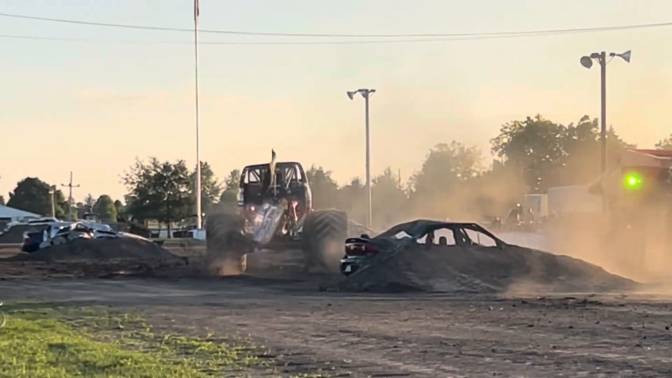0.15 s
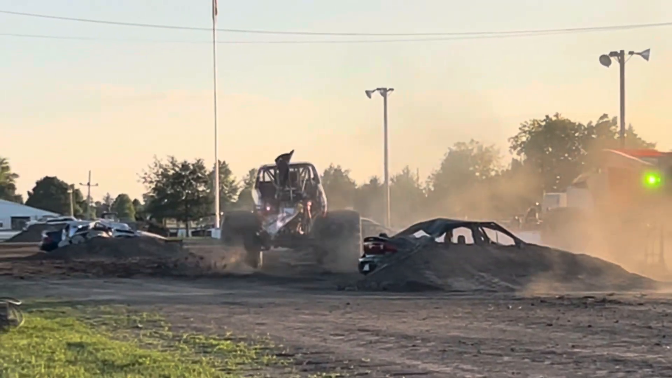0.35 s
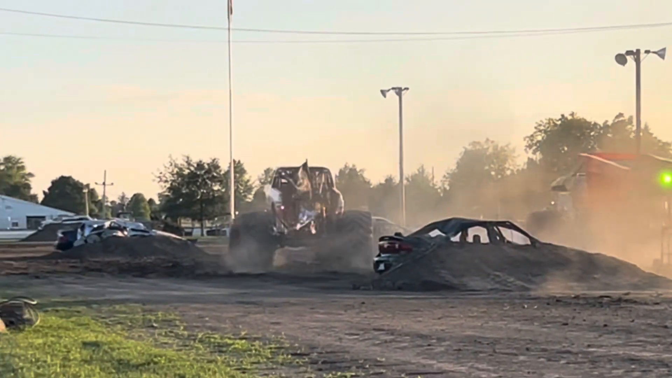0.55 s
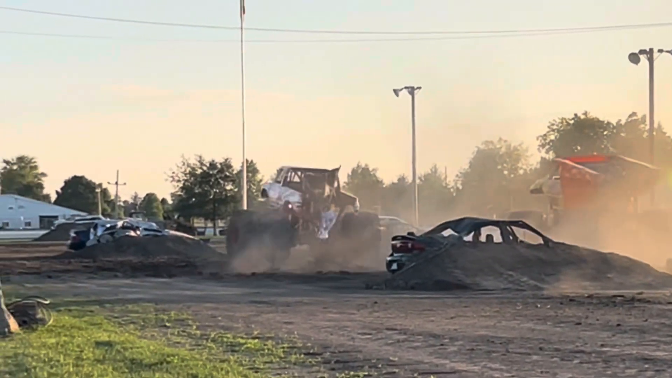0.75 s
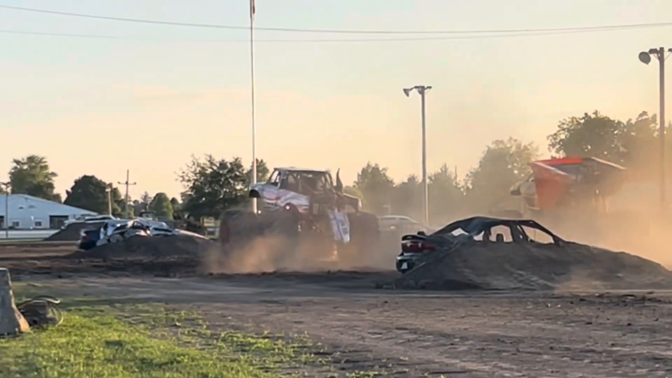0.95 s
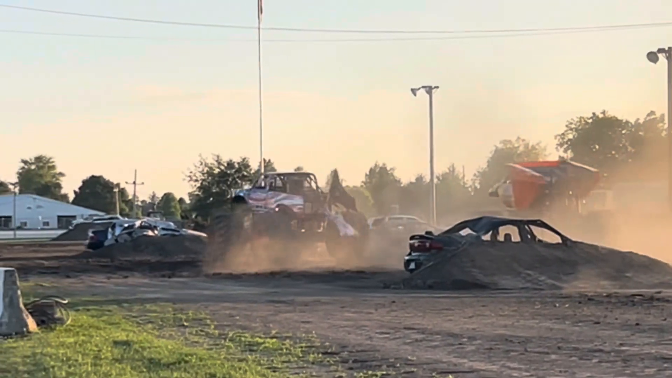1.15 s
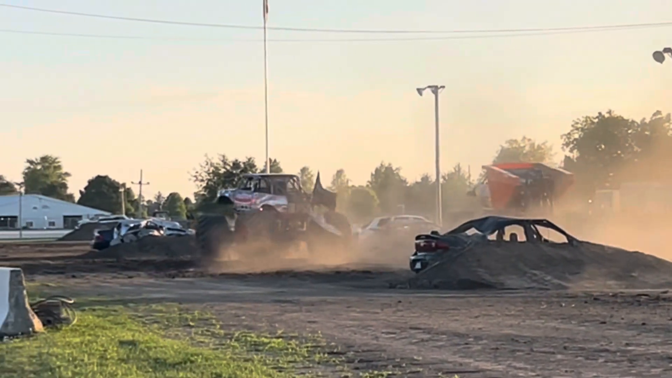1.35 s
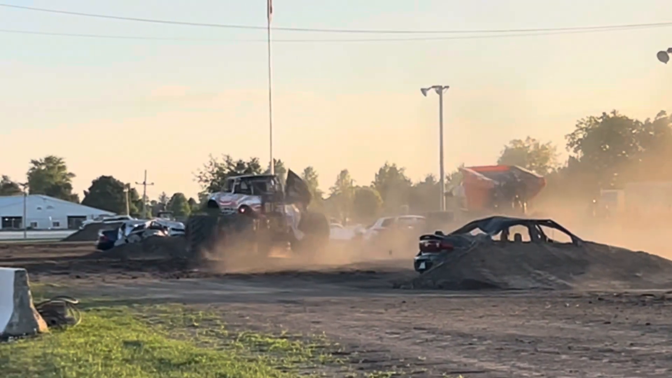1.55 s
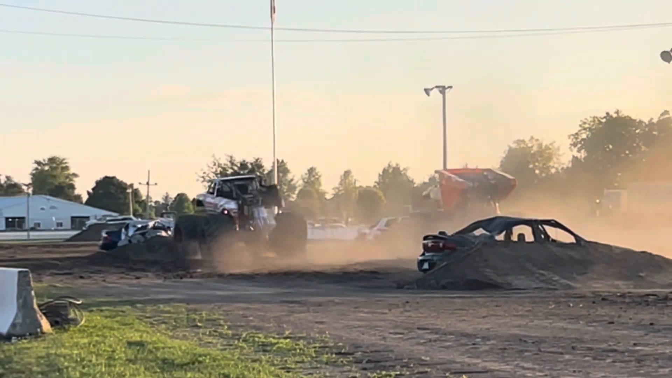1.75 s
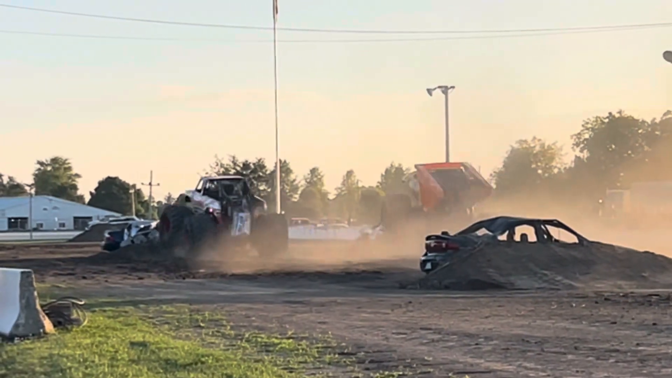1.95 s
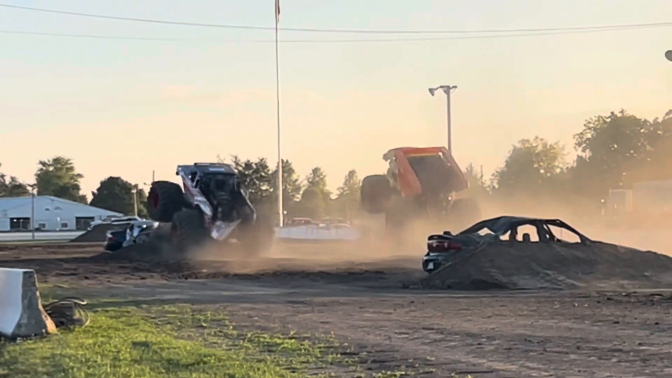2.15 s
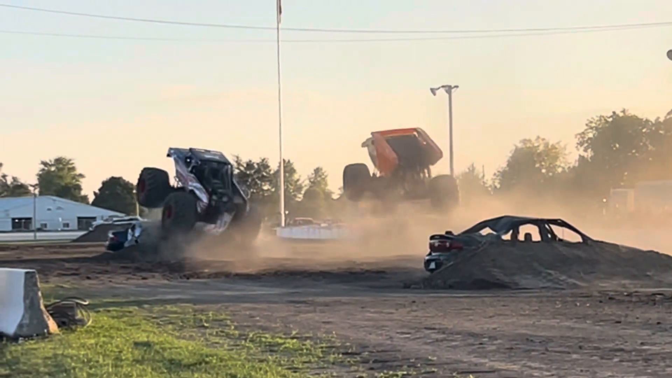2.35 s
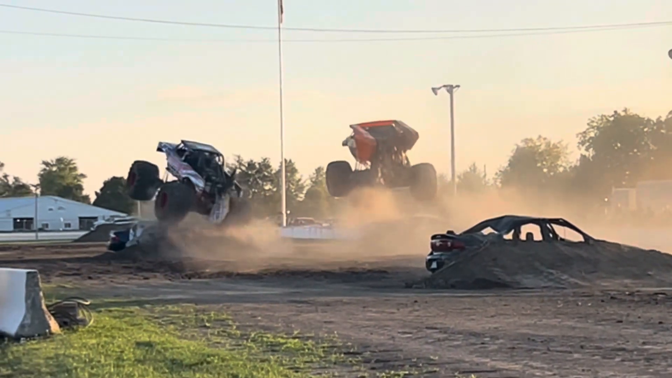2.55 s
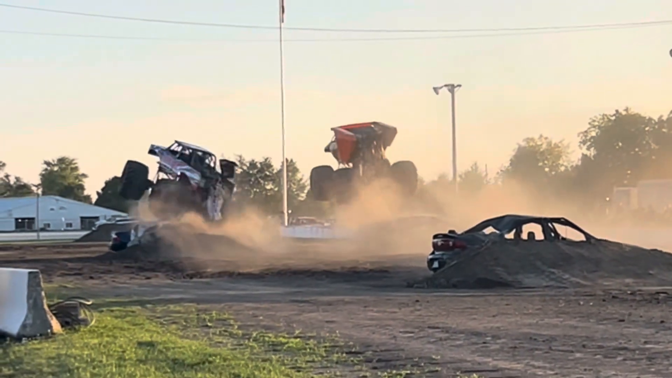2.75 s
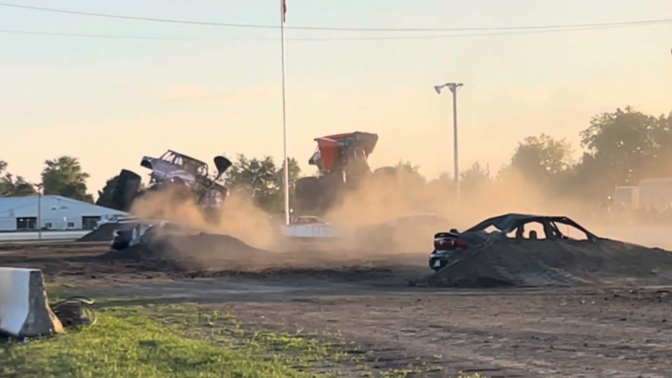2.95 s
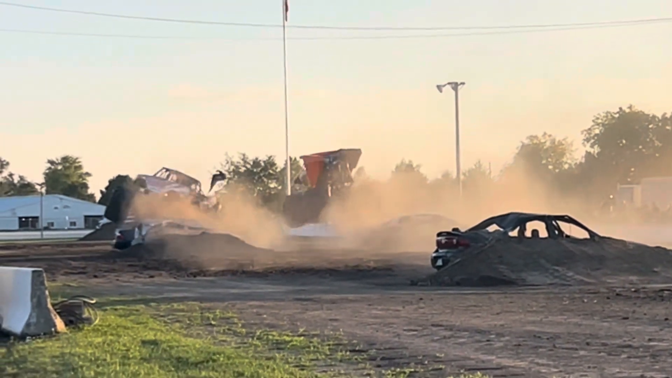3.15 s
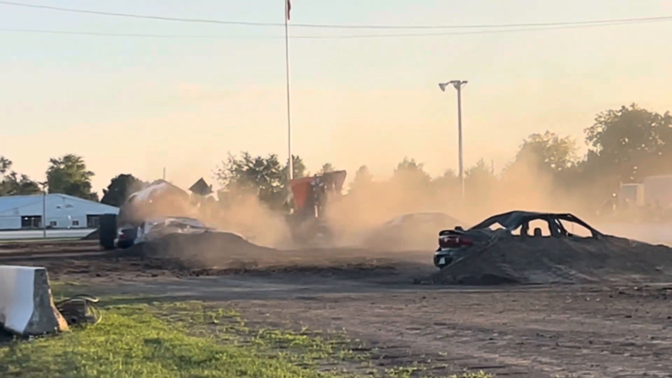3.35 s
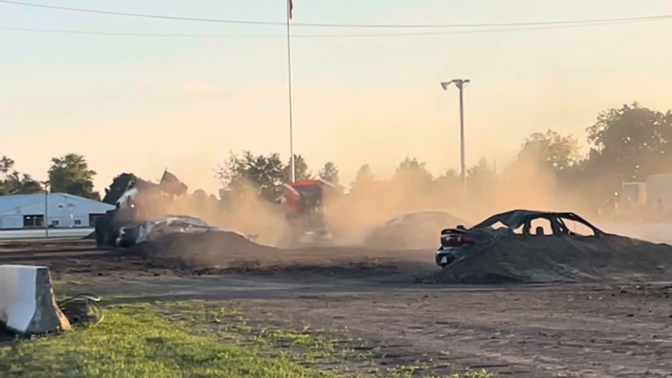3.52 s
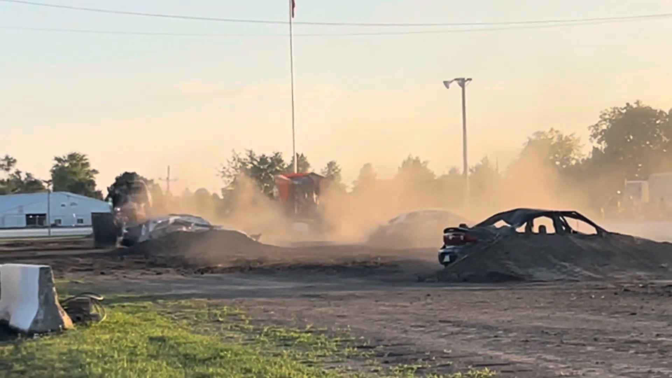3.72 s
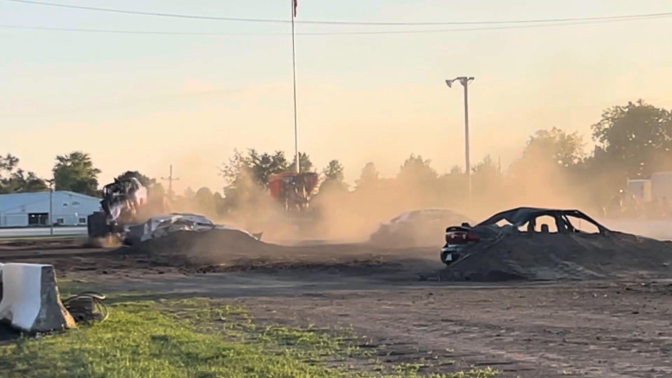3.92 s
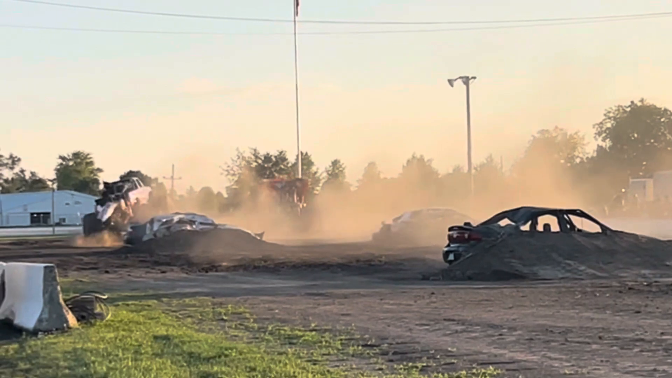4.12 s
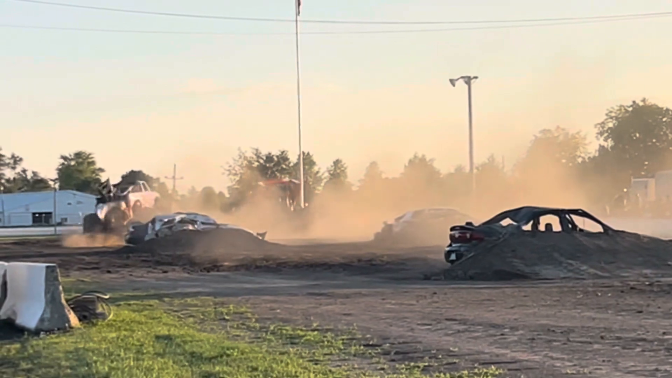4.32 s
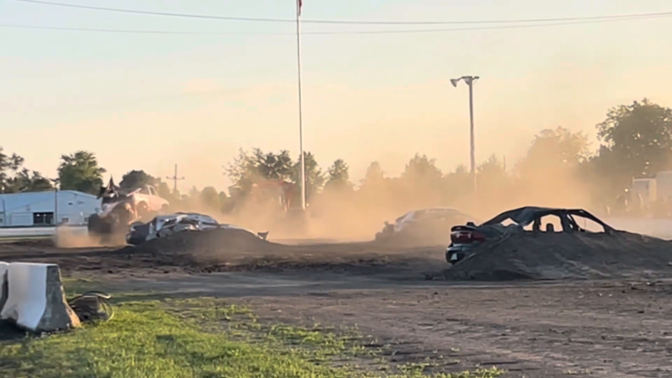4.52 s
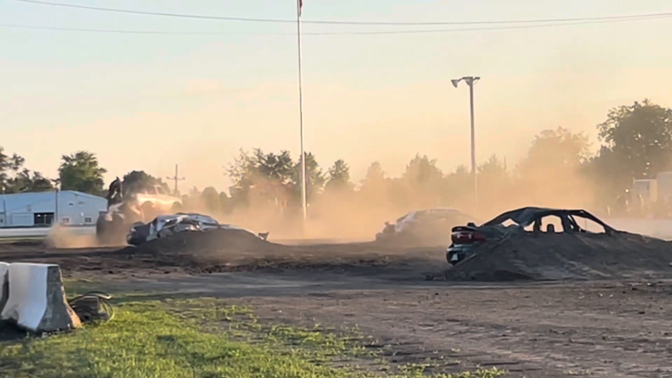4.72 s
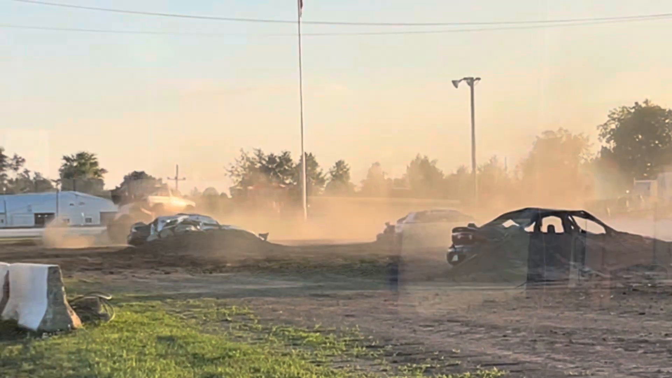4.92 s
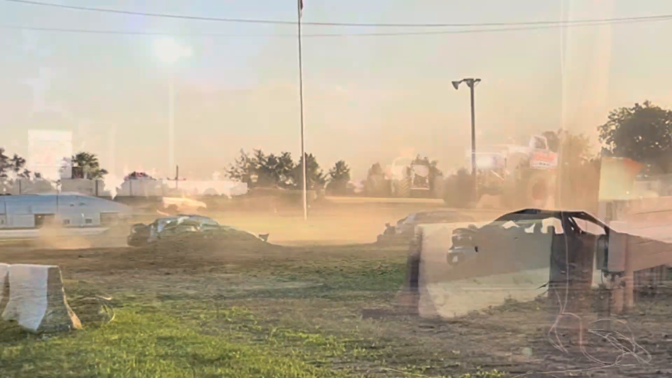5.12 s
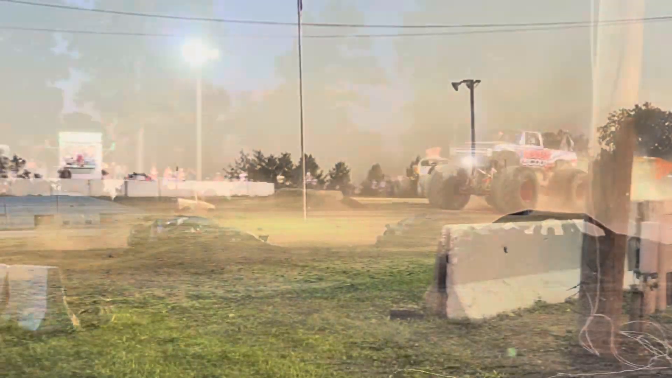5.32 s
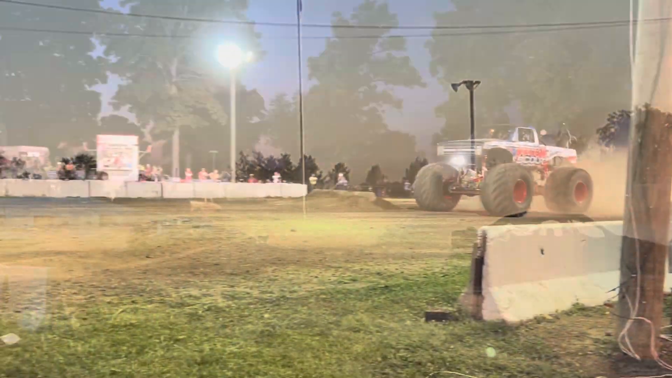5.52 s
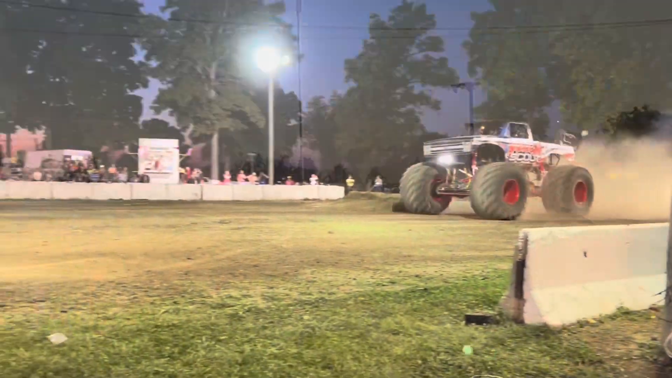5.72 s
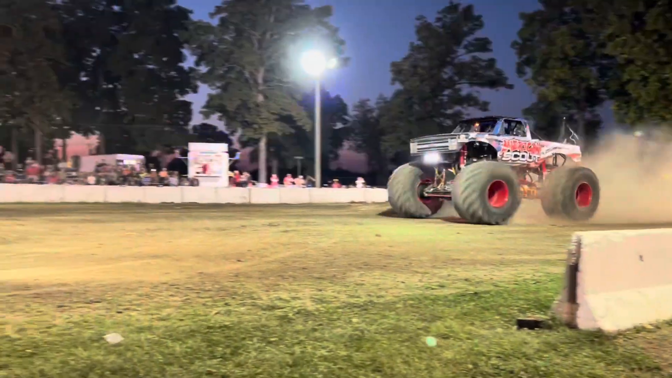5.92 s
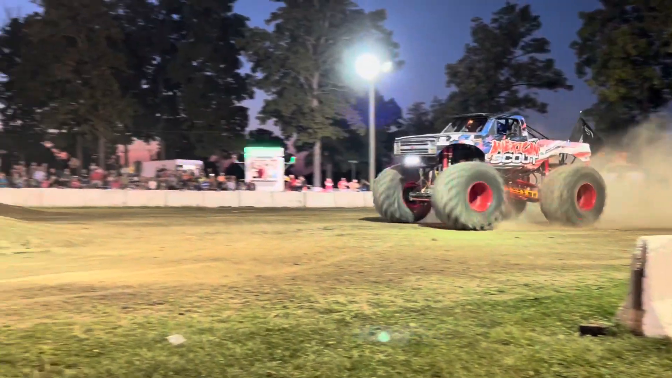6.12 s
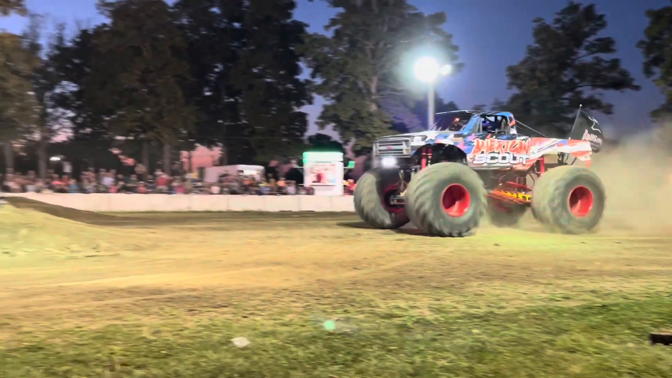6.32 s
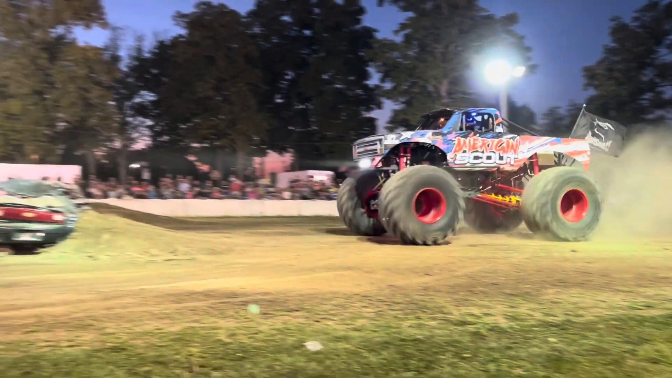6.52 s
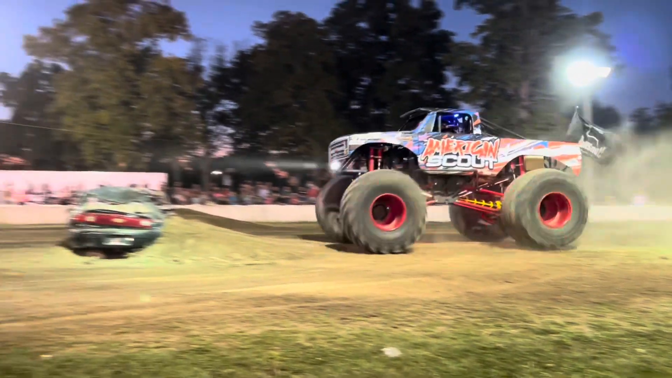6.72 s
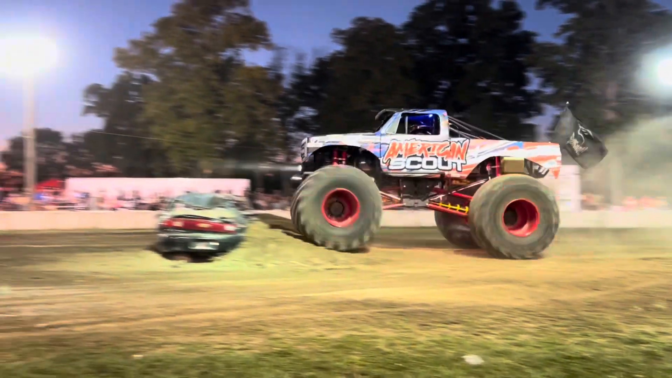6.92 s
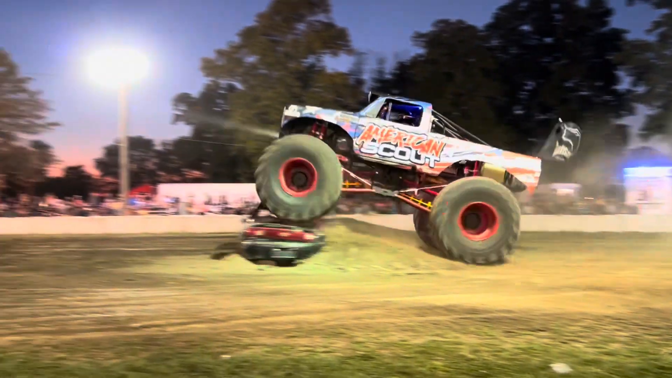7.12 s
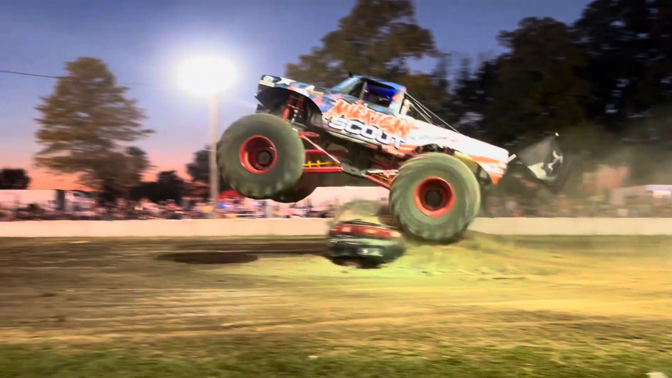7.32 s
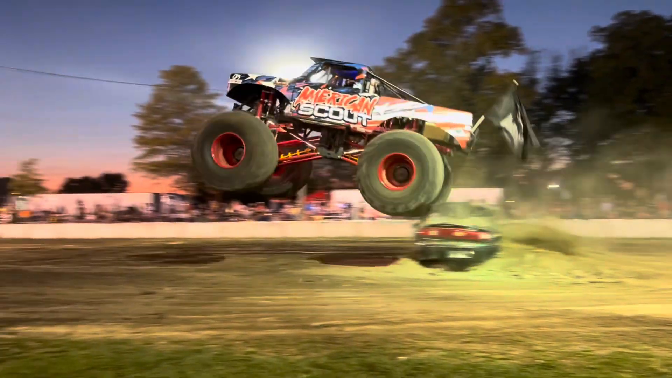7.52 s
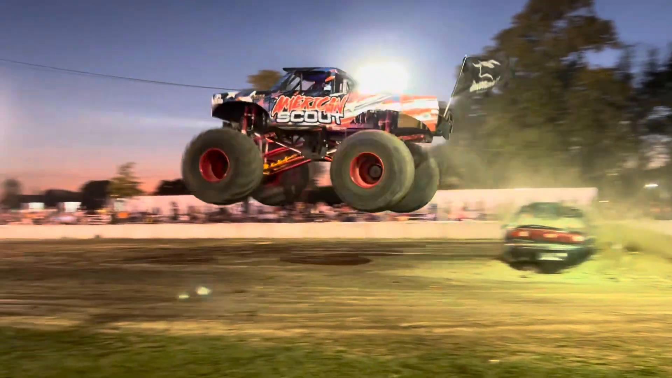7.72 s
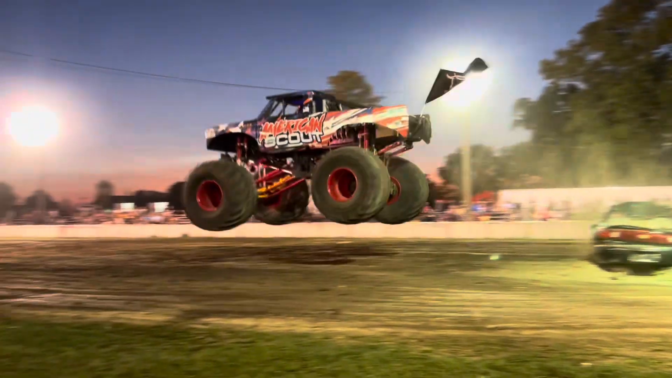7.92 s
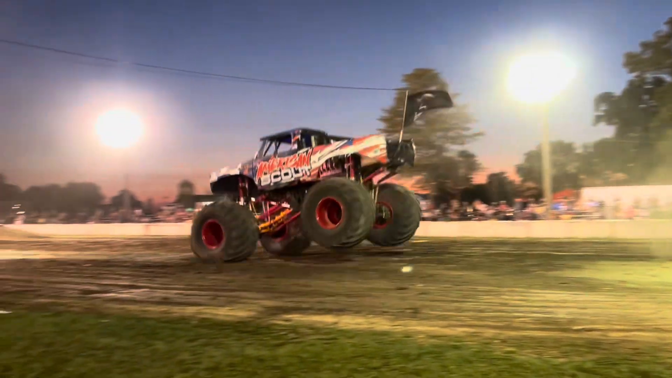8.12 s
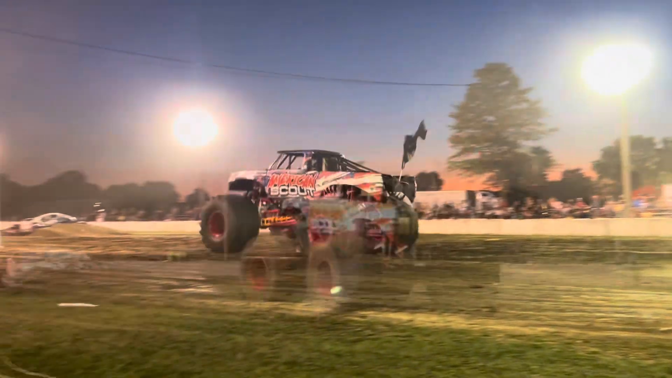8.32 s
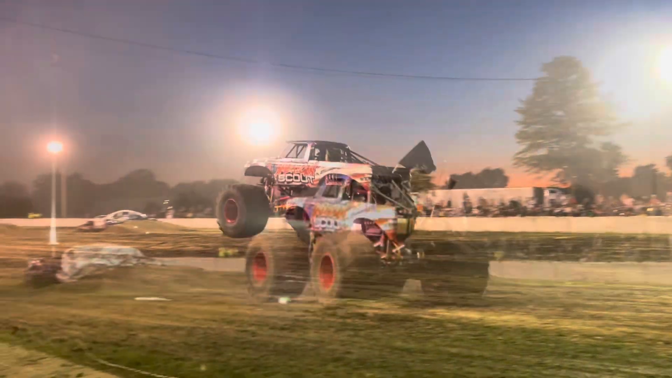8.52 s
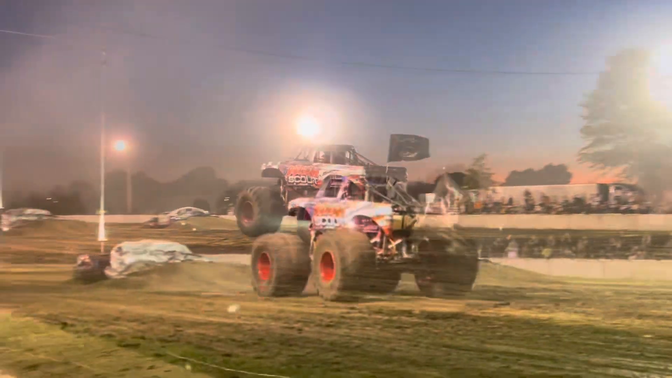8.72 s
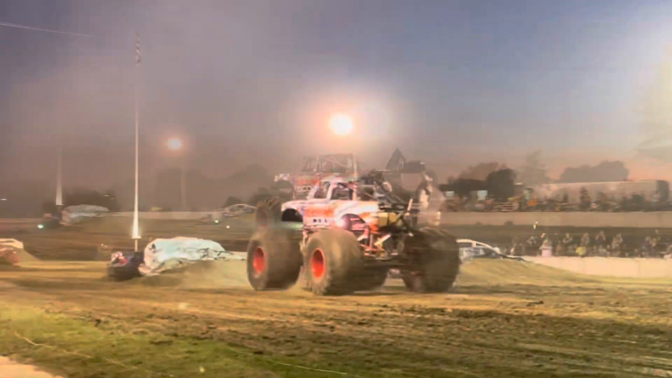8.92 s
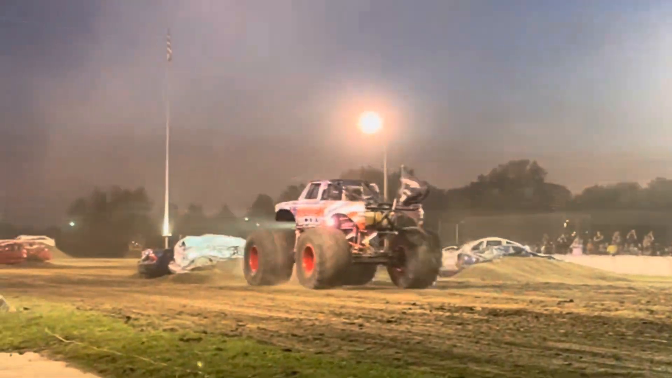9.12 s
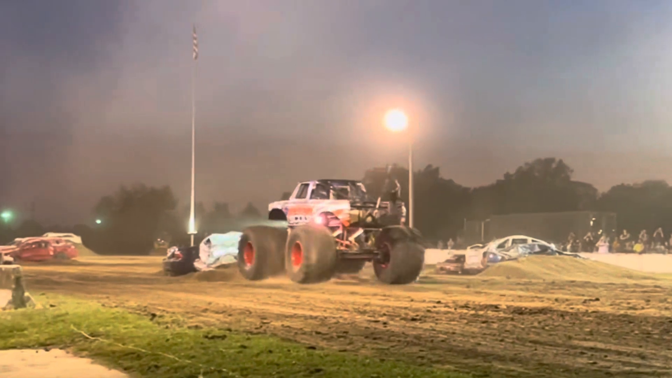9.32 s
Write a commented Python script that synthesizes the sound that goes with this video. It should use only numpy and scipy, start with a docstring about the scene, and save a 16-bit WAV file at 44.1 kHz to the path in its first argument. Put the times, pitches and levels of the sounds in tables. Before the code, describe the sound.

Handheld stereo microphone at an open-air showground: distant uneven engine bursts lie slightly left and sink to a coasting mutter. Around the middle, a much louder truck slightly right barks, surges, holds a full-throttle roar through a jump and stabs twice more, with overrun howl and small bangs. Softer growling blips follow, with faint reflections from fence and trees.

```python
"""Two far V8 monster trucks race over dirt jumps and coast away, heard in the open from the fence. Then, as the
scene changes, an idling mutter swells in and fades, a truck is gunned near by in short bursts, passes and blips
once after it lands; a last one revs farther off. Each engine drones on multiples of its cycle rate (eight
firings a cycle) and rasps as the throttle opens; speed and loudness chase the throttle. Waiting trucks add a
low rumble of band-limited noise. The microphone has two ports in a housing that shades and delays the sound."""
import sys
import numpy as np
from scipy import signal
from scipy.fft import rfft, irfft, next_fast_len
from scipy.io import wavfile
from scipy.ndimage import uniform_filter1d

SR = 44100
rng = np.random.default_rng(int(sys.argv[2]) if len(sys.argv) > 2 else 0)


def generate_wav(signal):
    """Clip the signal to [-1, 1] and save it as 16-bit WAV at the path in sys.argv[1]."""
    frames = np.transpose(np.atleast_2d(signal))
    scaled = np.clip(frames, -1, 1) * 32767
    pcm = np.round(scaled).astype(np.int16)
    wavfile.write(sys.argv[1], SR, pcm)


N = 412776
TIME = np.arange(N) / SR

# far racers: throttle of the first over the jumps
# [open_s, shut_s, toward_cycles_per_s, drone_db, rasp_rise_db]
FIRST_PULLS = [(0.0, 0.236, 34.5, -22, 9.5), (0.24, 0.529, 37, -22.5, 11), (0.53, 0.88, 35.8, -24, 9),
               (0.88, 1.22, 39.6, -23, 11.5), (1.391, 1.553, 35.6, -36, 2.5),
               (1.689, 1.929, 39.4, -27.5, 7.5), (2.048, 2.26, 26.2, -43, 5),
               (2.261, 2.399, 45.5, -21.5, 13), (2.399, 2.475, 39, -29, 12), (2.581, 2.679, 37, -28, 14),
               (2.679, 2.818, 45, -27, 13.5), (2.881, 3.1, 32, -52, 7.5), (3.099, 3.211, 45.6, -28, 12),
               (3.562, 3.731, 45, -33, 0.5)]
# longer pulls of the second, in a higher gear [open_s, shut_s, toward_cycles_per_s, drone_db]
SECOND_PULLS = [(0.0, 0.298, 48, -28.5), (0.361, 0.449, 49, -19), (0.56, 1.22, 42.7, -35.5),
                (1.39, 1.62, 43.7, -39.5), (1.62, 1.95, 44.8, -32.5), (2.0, 2.43, 47.4, -32.5),
                (2.799, 3.249, 60, -30)]
# multiples of the cycle rate favoured by the uneven firing of each bank [multiple, level_db]
FIRST_ORDERS = [(3, -16), (5, -16), (6, -13), (7, -15), (8, -1), (10, -16.5), (11, -16.5), (13, -22)]
SECOND_ORDERS = [(2, -13), (3, -3), (5, 0.5), (7, -12), (8, -6), (11, -9.5), (13, -11.5)]
# exhaust spectra of the racers [frequency_hz, level_db_per_hz]
RACE_BOOM = [(30, -30), (60, -8), (120, -3), (230, 2), (330, -1.5), (420, -4.5), (560, -7), (900, -17),
             (1500, -70)]
RACE_RASP = [(440, -27), (700, -5), (1150, -0.5), (1700, -3.5), (3200, -5), (4400, -12), (7420, -18),
             (8880, -22), (9710, -40), (10100, -68), (10800, -23), (11800, -29), (14600, -43), (16000, -47)]
# level as they draw away behind the ramps [time_s, level_db]
RACE_DISTANCE = [(0, 0.5), (3.2, 2.5), (3.7, -4.5), (4.2, -11), (4.85, -15), (5.4, -8)]
# treble, shadowed as they turn away [time_s, treble_db]
RACE_SHADOW = [(1.5, 20.5), (3, 5.5), (4.6, -13)]
# upper orders, swelling as the pipes swing toward the fence [time_s, level_db]
RACE_FACING = [(0.1, 0.5), (0.4, 6), (1.15, -2.5), (1.6, 10.5), (1.9, -0.5), (2.1, 5), (2.6, -7),
               (3.1, -3.5)]

# a low engine mutter swells in and fades as the scene changes [time_s, boom_db, rasp_db]
IDLE_SWELL = [(4.86, -62, -61), (4.92, -35, -48.5), (5.15, -35, -46), (5.38, -35, -51), (5.55, -22, -57)]

# near truck: stabs of the throttle [open_s, shut_s, toward_cycles_per_s, rasp_rise_db]
NEAR_STABS = [(5.453, 5.542, 19.8, 3), (5.54, 5.734, 33, 7), (5.734, 5.875, 46.4, 12),
              (6.219, 6.33, 44.2, 15), (6.402, 6.521, 47, 15), (6.535, 6.578, 28.9, 13),
              (6.579, 6.667, 45.8, 14), (6.935, 7.335, 47.9, 16.5), (7.463, 7.55, 49, 16.5),
              (7.671, 7.778, 50, 17)]
# multiples of its cycle rate [multiple, level_db]
NEAR_ORDERS = [(3, 1.5), (4, -17), (5, 0.5), (6, -15.5), (7, -12), (8, 0.5), (11, -3), (13, -6.5), (15, -8),
               (16, -13), (19, -11.5), (24, -12), (29, -12.5), (32, -11.5)]
# its headers with the ground reflection [frequency_hz, gain_db]
NEAR_PIPES = [(50, -10), (85, -8.5), (130, 0), (205, -1.5), (280, -4), (340, -7), (410, -20), (520, -7.5),
              (700, -6.5)]
# its exhaust spectra [frequency_hz, level_db_per_hz]
NEAR_BOOM = [(30, -26), (60, -3.5), (110, 1.5), (170, 3.5), (290, -6), (410, -17.5), (600, -12.5),
             (900, -30), (1500, -49)]
NEAR_RASP = [(240, -22), (400, -11.5), (626, -4), (800, -3.5), (994, -6.5), (1350, -6.5), (1650, -9),
             (3870, -16), (6150, -23), (8240, -22), (9040, -24.5), (10100, -72), (10900, -17.5),
             (11900, -24), (14400, -28.5), (16000, -30)]
# air rushing past its open throttle plates [frequency_hz, level_db_per_hz]
INTAKE = [(1200, -20), (3000, -1), (8000, -0.5), (13000, 2), (16000, -6)]
# level as it comes close, passes and turns its pipes away [time_s, level_db]
NEAR_PASS = [(5.35, -28.5), (5.5, -9.5), (5.8, 0.5), (6.5, 1.5), (7.05, -2), (7.4, -4.5), (8.1, -9.5),
             (8.3, -13)]
# third order against fifth as it turns side-on [time_s, third_over_fifth_db]
NEAR_ASPECT = [(5.8, -7.5), (6.85, -7.5), (7.1, 4), (7.7, 2), (7.9, -3.5)]
# howl of its pipes on the overrun [time_s, level_db]
HOWL = [(7.77, -48), (7.83, -26), (7.986, -38.5), (8.074, -59), (8.14, -44), (8.25, -61)]
# unburnt fuel banging in its pipes on the overrun [time_s, level_db]
POPS = [(7.85, -40), (7.884, -32)]

# throttle blips: first the near truck's after it lands, then the last truck's
# [open_s, shut_s, toward_cycles_per_s, rasp_rise_db]
LATE_BLIPS = [(8.312, 8.457, 47.3, 17), (8.484, 8.606, 34.6, 8.5), (8.666, 8.766, 25.7, 11.5),
              (8.76, 8.917, 38.5, 14.5), (8.92, 9.053, 35.5, 7.5), (9.069, 9.171, 50, -0.5),
              (9.197, 9.351, 48.5, 5)]
# multiples of the cycle rate for these blips [multiple, level_db]
LATE_ORDERS = [(3, 2), (4, -10), (5, -1), (6, -2.5), (7, -10), (8, -7), (11, -7.5), (13, -15)]
# headers for these blips [frequency_hz, gain_db]
LATE_PIPES = [(60, -20), (100, -24), (130, 0.5), (175, -4.5), (215, -7.5), (250, -6), (290, -1.5),
              (340, -8), (420, -19), (490, -12), (700, -13)]
# exhaust spectra for these blips [frequency_hz, level_db_per_hz]
LATE_BOOM = [(35, -38), (70, -0.5), (120, 0), (180, -3), (220, -7), (300, -1), (410, -12.5), (600, -14),
             (900, -32), (1500, -51)]
LATE_RASP = [(290, -35), (500, -18), (773, -0.5), (1600, -9.5), (7530, -22.5), (9090, -21.5), (10100, -76),
             (10800, -20), (11800, -22), (14000, -24), (16000, -35)]

# microphone housing shading a source fully on the left [frequency_hz, left_over_right_db]
SHADING = [(100, 2.1), (320, 3), (500, 1), (720, 10.5), (1250, 0)]
# sound from the right bending round the housing [frequency_hz, left_lead_rad]
RIGHT_PHASE = [(4000, 0), (5050, .9), (5900, -.85), (6400, 0)]
# between the two microphone ports [frequency_hz, left_lead_rad]
PORT_PHASE = [(7500, 0), (9600, -2.7), (10800, -3.3), (12800, -6.3), (14400, -6.3), (15600, -8.6)]
# treble notch of the microphone [low_hz, high_hz]
NOTCH_HZ = (9350, 10850)
CUTOFF_HZ = 15900

# a free-revving engine: idle speed, and time constants of spinning up and running down
IDLE_CYCLES_PER_S, SPIN_UP_S, RUN_DOWN_S = 20.4, 0.097, 0.156


def from_db(db):
    """Decibels to gain."""
    return 10 ** (np.asarray(db) / 20)


def rms_one(x):
    """Scale to rms 1."""
    return x / np.sqrt(np.mean(x ** 2) + 1e-20)


def in_time(rows):
    """Interpolate a table over time, one curve per column."""
    s, *columns = np.transpose(rows)
    return [np.interp(TIME, s, column) for column in columns]


def at_hz(points, hz):
    """Read a table on a log-frequency axis."""
    known, values = np.transpose(points)
    return np.interp(np.log(hz + 1e-3), np.log(known), values)


def heard(rows):
    """1 while a table lasts, with a short fade outside."""
    inside_s = np.minimum(TIME - rows[0][0], rows[-1][0] - TIME)
    return np.clip(1 + inside_s / 0.27, 0, 1)


def drift(rate_hz):
    """Slow random wander of rms 1: noise through two equal poles at rate_hz, made at SR / 40."""
    pole = np.exp(-2 * np.pi * rate_hz * 40 / SR)
    noise = rng.standard_normal(N // 40 + 2002)
    slow = signal.lfilter([1], [1, -2 * pole, pole * pole], noise)[2000:]   # drop the settling
    return np.interp(np.arange(N) / 40, np.arange(len(slow)), rms_one(slow))


def shape(x, response):
    """Filter by a function of frequency."""
    size = next_fast_len(N + SR // 2)
    hz = np.fft.rfftfreq(size, 1 / SR)
    return irfft(rfft(x, size) * response(hz), size)[..., :N]


def colour(x, spectrum):
    """Filter x by a spectrum table; rms 1."""
    return rms_one(shape(x, lambda hz: from_db(at_hz(spectrum, hz))))


def cut(x, hz, kind):
    """Second-order Butterworth design: low-, high- or band-pass."""
    return signal.sosfilt(signal.butter(2, hz, kind, fs=SR, output="sos"), x)


def scatter(t60_s):
    """A dying cloud of reflections with unit energy."""
    t = np.arange(int(t60_s * SR) + 2) / SR
    cloud = rng.standard_normal(len(t)) * from_db(-60 * t / t60_s)
    return cloud / np.linalg.norm(cloud)


def chase(opens, shuts, goals, rest, rise_s, fall_s, start=None):
    """An open throttle relaxes a quantity toward that pull's goal; a shut one, back toward rest."""
    out = np.full(N, rest if start is None else start, dtype=float)
    for on, off, held in zip(opens, shuts, goals):
        for at, goal, lag_s in ((on, held, rise_s), (off, rest, fall_s)):
            i = int(np.clip(at * SR, 0, N - 1))
            out[i:] = goal + (out[i] - goal) * np.exp(-TIME[:N - i] / lag_s)
    return out


def crank(speed, wobble):
    """Engine cycles turned so far; the speed is never quite even."""
    return np.cumsum(speed * (1 + wobble * drift(25))) / SR


def drone(cycles, orders, waver_db, gain_db=lambda k: 0):
    """Clean low orders of the engine cycle, each wavering on its own; also their joint rms."""
    out, power = 0, 0
    for k, db in orders:
        k = round(k)
        gain = from_db(db + gain_db(k))
        waver = from_db(waver_db * np.tanh(drift(7.4)))
        out = out + gain * waver * np.sin(2 * np.pi * (k * cycles + rng.random()))
        power = power + gain ** 2   # before the waver
    return np.sqrt(2) * out, np.sqrt(power)


def firings(cycles, speed, far_bank_db, uneven_db, path_s=0.0009, jitter_s=0.00004):
    """One click per cylinder, the far bank at its own level; and the chance part of the clicks alone."""
    count = np.floor(8 * cycles).astype(int)
    at = np.flatnonzero(np.diff(count))
    cylinder = count[at] % 8
    far_bank = np.array([0, 1, 0, 1, 1, 0, 1, 0])[cylinder]
    chance, slip = rng.standard_normal((len(at), 2)).T
    late_s = path_s * rng.random(size=8)[cylinder] + jitter_s * slip   # every header has its own length
    at = np.clip(at + (late_s * SR).astype(int), 0, N - 1)
    clicks, stumbles = np.zeros((2, N))
    clicks[at] = from_db(far_bank_db * far_bank + uneven_db * np.clip(chance, -2, 2))
    stumbles[at] = chance
    # more clicks a second must not add power
    return clicks / np.sqrt(speed), stumbles / np.sqrt(speed)


def rasp(clicks, spectrum, ring_t60_s, puff_s, ring_db, crackle_db, hiss_db):
    """Each firing rings the open header and blows a puff of turbulent gas, with small shocks in it."""
    # the ring arrives by paths that shift as the truck moves, so its colour never stands still
    ringing = sum(drift(4.55) * signal.oaconvolve(clicks, scatter(ring_t60_s))[:N] for path in range(4))
    ringing = ringing / np.sqrt(uniform_filter1d(ringing ** 2, SR // 12) + 1e-20)
    decay = np.exp(-1 / (puff_s * SR))
    puffs = rms_one(signal.lfilter([1], [1, -decay], clicks + 1e-12))
    shocks = (rng.random(N) < 1500 / SR) * rng.random(N) * puffs   # about 1500 a second
    gas = (puffs + from_db(hiss_db)) * rng.standard_normal(N)
    mix = rms_one(gas) + from_db(ring_db) * ringing - from_db(crackle_db) * rms_one(shocks)
    out = colour(mix, spectrum)
    return out / np.std(cut(out, 1090, "high"))


def brighten(x, treble_db, edge_hz):
    """The harder the exhaust is driven, the steeper its wave fronts and the more treble."""
    dull = shape(x, lambda hz: 1 / (1 + (hz / edge_hz) ** 4))
    return dull + (x - dull) * from_db(treble_db)


def surge(pressure, depth_db):
    """Gain, rms 1: the rasp tears loose on the crests of the exhaust's slow pressure wave."""
    return rms_one(from_db(depth_db * np.tanh(pressure)))


def first_racer():
    """Worked in short pulls over the jumps: its speed, drone level and rise of the rasp."""
    opens, shuts, speeds, drones_db, rises_db = np.transpose(FIRST_PULLS)
    speed = chase(opens, shuts, speeds, rest=23, rise_s=0.115, fall_s=0.23, start=39.4)
    drone_db = chase(opens, shuts, drones_db, rest=-40.0, rise_s=0.037, fall_s=0.059, start=drones_db[0])
    open_db = chase(opens, shuts, rises_db, rest=0, rise_s=0.037, fall_s=0.063, start=rises_db[0])
    return speed, drone_db, open_db


def second_racer():
    """Held in gear, so slow to gain and lose speed: its speed and drone level."""
    opens, shuts, speeds, drones_db = np.transpose(SECOND_PULLS)
    speed = chase(opens, shuts, speeds, rest=21.7, rise_s=0.178, fall_s=1.0, start=36)
    drone_db = chase(opens, shuts, drones_db, rest=-38.5, rise_s=0.17, fall_s=0.053)
    return speed, drone_db


def racers():
    """Two far engines drone against each other; their booms and rasps merge."""
    speed_a, drone_a_db, open_db = first_racer()
    speed_b, drone_b_db = second_racer()
    far_db, shadow_db, facing_db = in_time(RACE_DISTANCE) + in_time(RACE_SHADOW) + in_time(RACE_FACING)
    boom_db = 0.87 * far_db + 0.45 * open_db - 36.0
    rasp_db = far_db + open_db - 44.0
    cycles_a, cycles_b = crank(speed_a, wobble=0.004), crank(speed_b, wobble=0.006)

    def gain_a_db(k):
        return facing_db * (k > 8)

    def gain_b_db(k):
        # the pipes pass little of the higher notes
        return -np.maximum(k * speed_b - 510, 0) / 12 + facing_db * (k > 6)

    tone_a, _ = drone(cycles_a, FIRST_ORDERS, waver_db=3.0, gain_db=gain_a_db)
    tone_b, _ = drone(cycles_b, SECOND_ORDERS, waver_db=5.5, gain_db=gain_b_db)
    tone = from_db(drone_a_db) * tone_a + from_db(drone_b_db) * tone_b

    clicks_a, stumbles_a = firings(cycles_a, speed_a, far_bank_db=-11, uneven_db=2.5)
    clicks_b, stumbles_b = firings(cycles_b, speed_b, far_bank_db=0.5, uneven_db=3.5)
    boom = from_db(boom_db) * colour(stumbles_a + stumbles_b, RACE_BOOM)

    bark = rasp(clicks_a + from_db(0.5) * clicks_b, RACE_RASP, ring_t60_s=0.03, puff_s=0.0012,
                ring_db=-3.0, crackle_db=-8.5, hiss_db=18)
    bark = bark + from_db(open_db - 21.5) * cut(bark, [1500, 2400], "band")   # headers blare at full throttle
    bark = bark * surge(np.sin(2 * np.pi * cycles_a), depth_db=0.5)
    treble_db = 0.51 * (rasp_db + 29.5) + shadow_db
    bark = from_db(rasp_db) * brighten(bark, treble_db, edge_hz=14700)
    return heard(RACE_DISTANCE) * (from_db(0.97 * far_db) * tone + boom + bark)


def idlers():
    """Trucks waiting around the track keep up a low rumble: wavering band-limited noise."""
    rumble = rms_one(cut(rng.standard_normal(N), [70, 190], "band"))
    return from_db(-44.0) * rumble * from_db(1.0 * drift(6.1))


def idle_swell():
    """As the scene changes, an uneven engine mutter under a soft rasp swells in and fades away."""
    boom_db, rasp_db = in_time(IDLE_SWELL)
    speed = 23.5   # cycles per s
    cycles = crank(speed, wobble=0.011)
    tone, size = drone(cycles, NEAR_ORDERS, waver_db=5.5, gain_db=lambda k: at_hz(NEAR_PIPES, k * 26.25))
    clicks, stumbles = firings(cycles, speed, far_bank_db=4, uneven_db=0.0)
    boom = from_db(-4.5) * tone / size + from_db(-5.0) * colour(stumbles, NEAR_BOOM)
    bark = rasp(clicks, RACE_RASP, ring_t60_s=0.018, puff_s=0.005, ring_db=-7, crackle_db=-20, hiss_db=16)
    return heard(IDLE_SWELL) * (from_db(boom_db) * boom + from_db(rasp_db) * bark)


def near_truck():
    """Orders sweep the pipe resonances; intake hiss leads, upper orders jump in, rasp builds with load."""
    opens, shuts, speeds, rises_db = np.transpose(NEAR_STABS)
    speed = chase(opens, shuts, speeds, IDLE_CYCLES_PER_S, SPIN_UP_S, RUN_DOWN_S)
    open_db = chase(opens, shuts, rises_db, rest=0, rise_s=0.0019, fall_s=0.022)
    load_db = chase(opens, shuts, rises_db, rest=0, rise_s=0.064, fall_s=0.014)   # engine takes up the load
    pass_db, aspect_db, howl_db = in_time(NEAR_PASS) + in_time(NEAR_ASPECT) + in_time(HOWL)
    # the boom grows with speed, and by a share of the throttle's rise
    boom_db = pass_db - 19 + 0.2961 * (speed - IDLE_CYCLES_PER_S) + 0.34 * open_db
    cycles = crank(speed, wobble=0.006)
    upper_db = 0.63 * open_db - 9.5   # the upper orders jump in with the throttle

    def gain_db(k):
        pipes_db = at_hz(NEAR_PIPES, k * speed)
        side_on_db = 0.5 * aspect_db * (int(k == 3) - int(k == 5) + 0.5 * (k > 8))
        tear_db = 6 * np.tanh(drift(47)) if k > 8 else 0   # the upper orders tear unevenly
        return pipes_db + upper_db * (k > 7) + side_on_db + tear_db

    tone, size = drone(cycles, NEAR_ORDERS, waver_db=4.5, gain_db=gain_db)
    clicks, stumbles = firings(cycles, speed, far_bank_db=-7.5, uneven_db=-1.5)
    boom = from_db(-2.0) * tone / size + from_db(-12.5 + 0.03 * open_db) * colour(stumbles, NEAR_BOOM)

    bark = rasp(clicks, NEAR_RASP, ring_t60_s=0.02, puff_s=0.0025, ring_db=2.5, crackle_db=-5, hiss_db=-1)
    airborne = np.clip((TIME - 7.2) / 0.22, 0, 1)   # off the ground, the dip of the ground reflection fills in
    bark = bark + airborne * from_db(7.5) * cut(bark, [300, 520], "band")
    spent = np.clip(0.7 - open_db / 25, 0, 1)   # off the throttle the puffs run together into a smooth rush
    rush = np.std(bark) * colour(rng.standard_normal(N), NEAR_RASP)
    bark = np.sqrt(1 - spent) * bark + np.sqrt(spent) * rush
    bark = bark * surge(tone / size, depth_db=0.11 * open_db)
    # the rasp builds as the revs climb past their middle, 30.7 cycles per s
    revs_db = 0.0448 * (speed - 30.7)
    rasp_db = 0.48 * boom_db + 0.68 * open_db + 0.23 * load_db + revs_db - 29.5
    bark = from_db(rasp_db) * brighten(bark, treble_db=0.51 * load_db - 7, edge_hz=9700)

    intake_gain = chase(opens, shuts, from_db(rises_db - 49.5), rest=0, rise_s=0.00066, fall_s=0.031)
    intake = intake_gain * colour(rng.standard_normal(N), INTAKE)
    howl = from_db(howl_db) * heard(HOWL) * rms_one(cut(stumbles, [515, 610], "band"))
    return heard(NEAR_PASS) * (from_db(boom_db) * boom + bark) + intake + howl + pops()


def pops():
    """Short bangs of band-limited noise that ring the near pipes, each starting at once and dying away alike."""
    level = sum(from_db(db) * (TIME >= s) * np.exp(-np.abs(TIME - s) / 0.016) for s, db in POPS)
    return level * rms_one(cut(rng.standard_normal(N), [480, 1100], "band"))


def late_blips():
    """The landed near truck's blip, then a farther truck's; growls when an order meets a header resonance."""
    opens, shuts, speeds, rises_db = np.transpose(LATE_BLIPS)
    speed = chase(opens, shuts, speeds, IDLE_CYCLES_PER_S, rise_s=0.07, fall_s=0.24)
    open_db = chase(opens, shuts, rises_db, rest=0, rise_s=0.03, fall_s=0.055)
    cycles = crank(speed, wobble=0.008)
    tone, _ = drone(cycles, LATE_ORDERS, waver_db=5.5, gain_db=lambda k: at_hz(LATE_PIPES, k * speed))
    clicks, stumbles = firings(cycles, speed, far_bank_db=-1.0, uneven_db=3)
    boom = from_db(0.78 * open_db - 38.0) * tone
    boom = boom + from_db(0.73 * open_db - 42.0) * colour(stumbles, LATE_BOOM)
    throat_tone, _ = drone(cycles, NEAR_ORDERS, waver_db=1)
    throat = from_db(open_db - 54) * cut(throat_tone, [680, 1150], "band")
    bark = rasp(clicks, LATE_RASP, ring_t60_s=0.02, puff_s=0.003, ring_db=1, crackle_db=-12, hiss_db=4)
    present = np.clip(1 + (TIME - opens[0]) / 0.33, 0, 1)   # fades in ahead of the first blip
    return present * (boom + throat + from_db(open_db - 50.5) * bark)


def showground(x, leftward):
    """Place a source to one side, with diffuse returns from the fence and the trees."""
    sides = np.array([[1], [-1]])
    direct = shape(x, lambda hz: from_db(0.5 * leftward * at_hz(SHADING, hz) * sides))
    middle, treble = cut(x, [350, 2000], "band"), cut(x, 11200, "high")
    around = np.array([signal.oaconvolve(middle, scatter(t60_s=0.3))[:N] for side in range(2)])
    # glints off the barrier close by
    glints = np.array([signal.oaconvolve(treble, scatter(t60_s=0.035))[:N] for side in range(2)])
    return direct + from_db(-11) * around + from_db(-13.5) * glints


def out_of_phase(x, table):
    """Let the left channel lead the right by a table of phases, half on each side."""
    return shape(x, lambda hz: np.exp(0.5j * at_hz(table, hz) * np.array([[1], [-1]])))


def scene():
    """The race lies a little to the left, the single trucks a little to the right."""
    race = showground(racers(), leftward=0.83)
    singles = showground(idle_swell() + near_truck() + late_blips(), leftward=-0.56)
    return race + out_of_phase(singles, RIGHT_PHASE) + idlers()


def record(dry):
    """Two microphone ports that differ in phase, rounded peaks, a narrow treble notch and a steep top cut."""
    ports = out_of_phase(dry, PORT_PHASE)
    rounded = 1.2 * np.tanh(ports / 1.2)
    notch = signal.butter(6, NOTCH_HZ, "bandstop", fs=SR, output="sos")
    top_cut = signal.ellip(10, 0.3, 80, CUTOFF_HZ, fs=SR, output="sos")   # 0.3 dB ripple, 80 dB down
    return signal.sosfilt(top_cut, signal.sosfilt(notch, rounded))


dry = scene()
out = record(dry)
generate_wav(out)
```